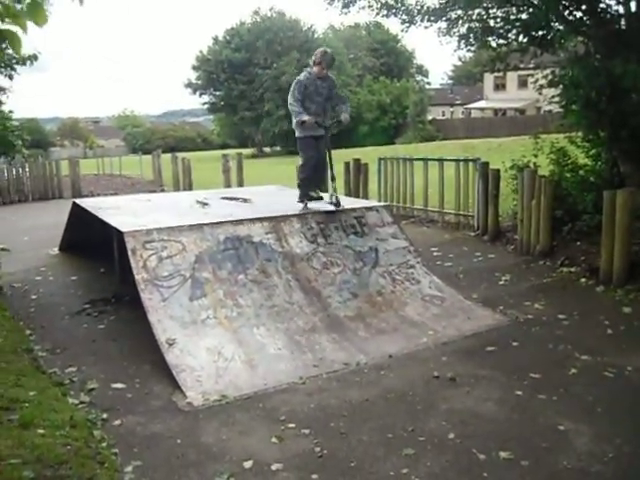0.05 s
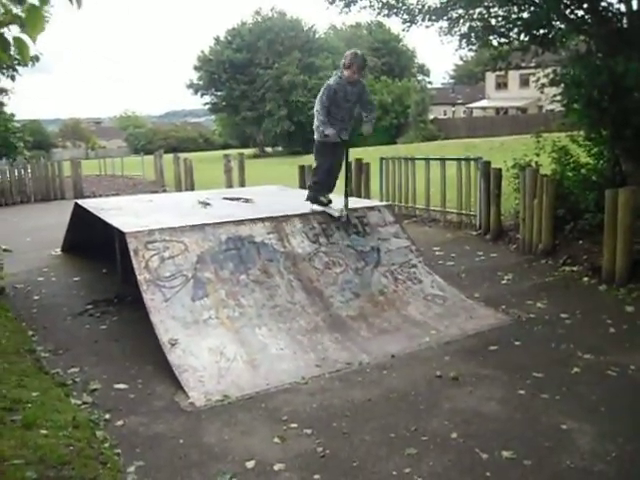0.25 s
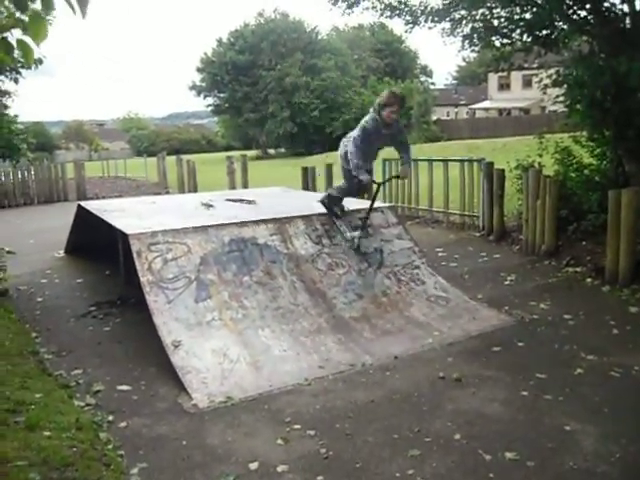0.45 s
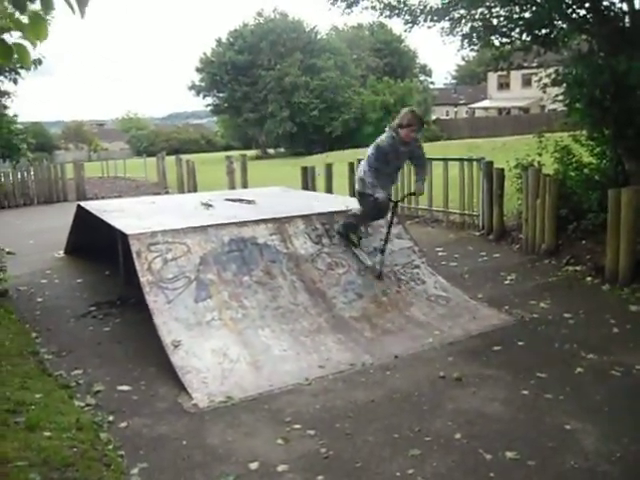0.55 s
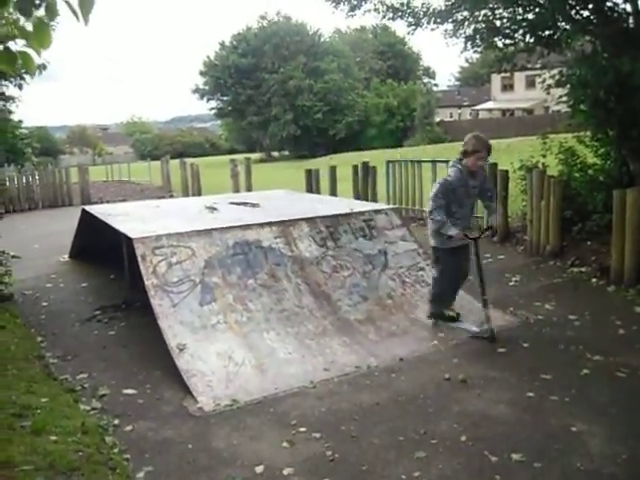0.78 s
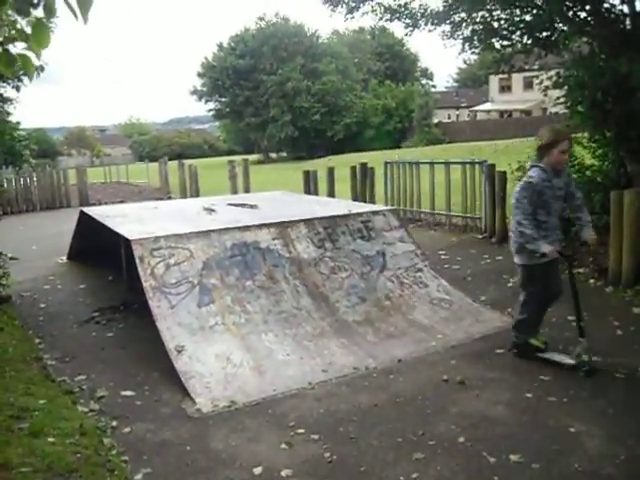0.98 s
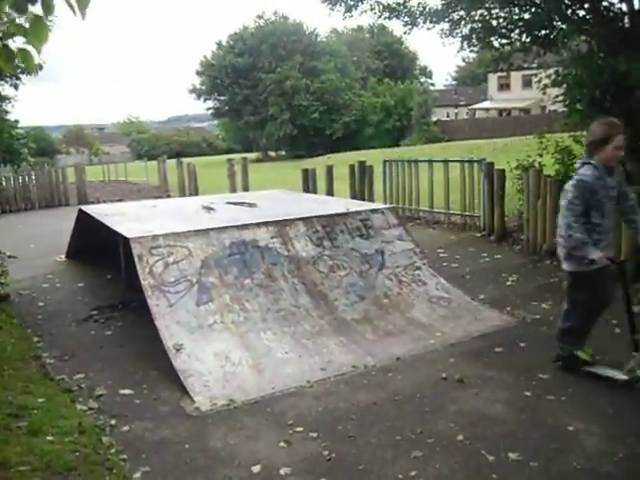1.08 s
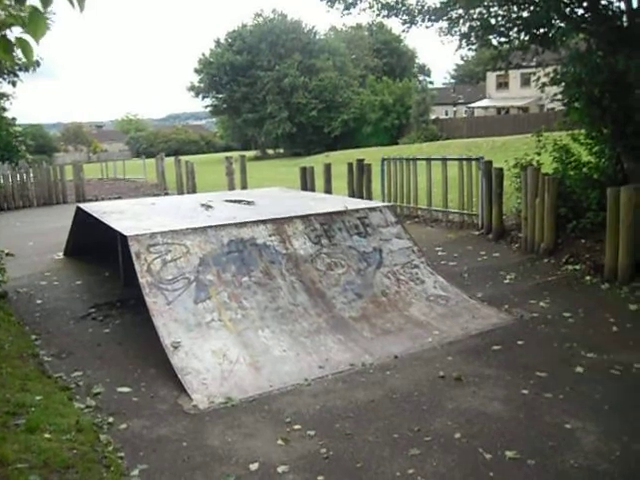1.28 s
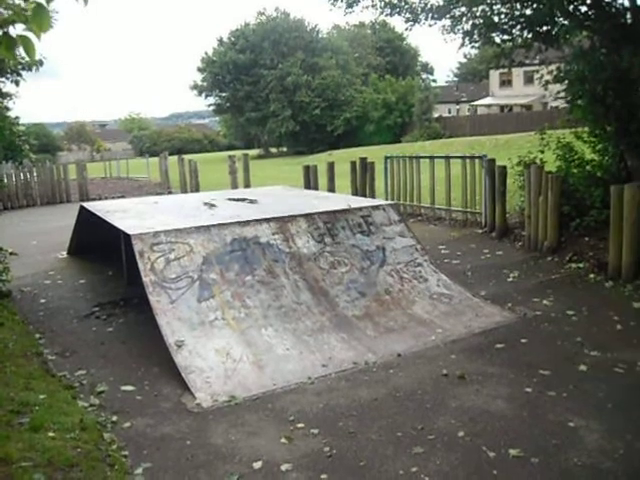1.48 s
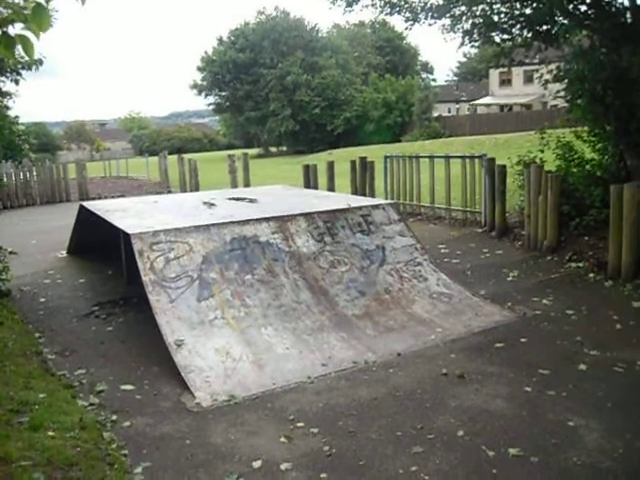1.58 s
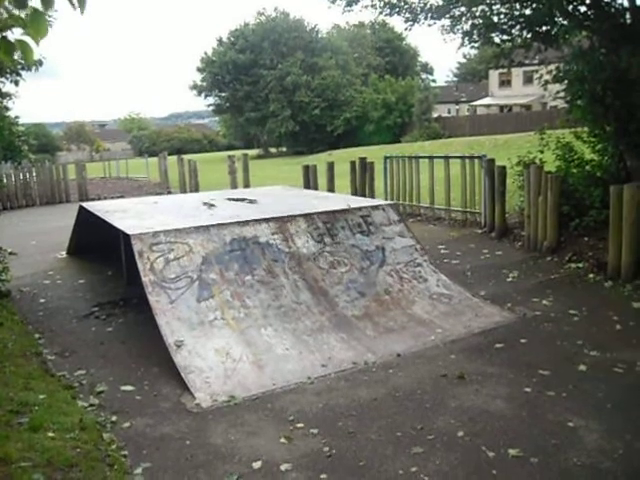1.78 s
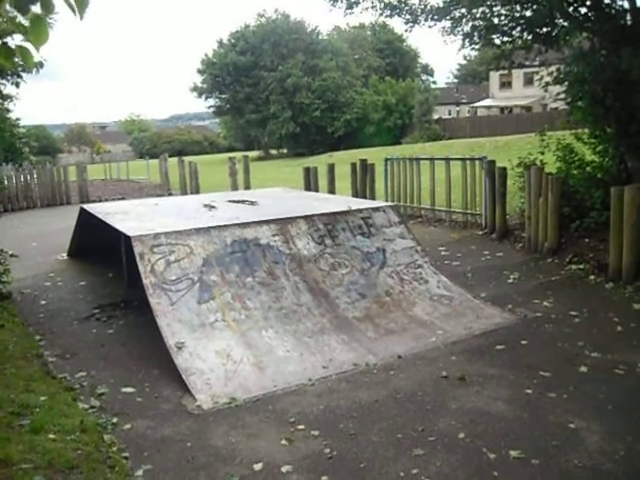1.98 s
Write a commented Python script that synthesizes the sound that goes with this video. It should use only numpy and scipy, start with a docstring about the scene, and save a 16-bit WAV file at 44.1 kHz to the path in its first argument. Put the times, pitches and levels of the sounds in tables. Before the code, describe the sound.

Kick scooter dropping down a booming ramp with metal clacks, then rolling off on gritty asphalt.

```python
"""Faint open air, then three hard clacks as a kick scooter drops into a sheet-covered skate ramp.
Its metal clangs against the edge, and its weight makes the hollow ramp boom.
The wheels rumble down the slope and roll off over rough asphalt, where loose parts rattle
at every bump and grit crackles, hisses and sets the wheels singing."""
import sys
import numpy as np
from scipy import signal
from scipy.fft import rfft, irfft
from scipy.io import wavfile

SR = 44100
rng = np.random.default_rng(int(sys.argv[2]) if len(sys.argv) > 2 else 0)


def master(y):
    """Save y as 16-bit WAV."""
    cut = np.clip(np.atleast_2d(y).T, -1, 1)
    pcm = np.round(cut * 32767)  # scale
    wavfile.write(sys.argv[1], SR, pcm.astype(np.int16))


N = 90404
TIME = np.arange(N) / SR


# the air's colour, meaning how strong it is from low to high: (frequency [Hz], level [dB per Hz])
AIR_COLOUR = [(28, -2), (55, -10), (100, -14), (280, -27.5), (600, -32.5), (6000, -38.5), (8500, -41)]

def open_air():
    """A faint, steady, deep rush of noise."""
    return from_db(-52.5) * coloured(rng.standard_normal(N), AIR_COLOUR)


# hits and bounces at the ramp's edge and foot: (time [s], level [dB], treble [dB], contact length [s],
# boosted frequency [Hz], clang pitch [ratio], ring level [dB], ring fade time [s])
HITS = [(0.2065, -18, 1, 0.004, 4180, 0.97, -25.5, 0.24),
        (0.246, -37.5, -0.5, 0.0062, 2860, 1.02, -38, 0.29),
        (0.3774, -25, 2.5, 0.004, 1400, 1.1, -36, 0.22),
        (0.4778, -17, 0.5, 0.0021, 3030, 1.11, -31.5, 0.22),
        (0.4809, -19, -1.5, 0.0038, 1100, 1.12, -29, 0.21), (0.756, -38, -8, 0.0064, 1060, 1.1, -47, 0.083),
        (0.916, -24.5, -8.5, 0.0022, 2080, 1.27, -44, 0.2)]
# colours of the crack and of the ringing after it: (frequency [Hz], level [dB per Hz])
CRACK_COLOUR = [(350, -6), (600, -1), (850, 1), (1100, 5.5), (1600, 3), (2050, 3), (3200, 3.5),
                (4200, -3.5), (5500, 5.5), (7000, -4.5), (8500, -28)]
AFTER_RING_COLOUR = [(350, -13), (700, -5.5), (1300, -3), (2000, 5), (2900, 1.5), (4200, 4.5), (5600, -5.5),
                     (7000, -1), (8500, -35)]
# notes of the metal touching the edge, and of the deck and bar: (frequency [Hz], level [dB])
CLANG_NOTES = [(860, -10), (1320, -13.5), (2000, -9.5), (2830, -8.5), (3380, -11.5), (3950, -9.5),
               (4300, -11), (6850, -22.5)]
FRAME_NOTES = [(1780, -6), (2130, -4.5), (2470, -3), (2762, 3), (2830, 1.5), (2948, -1.5), (3747, -8.5),
               (4011, -6), (4320, -4)]
CRACK_DB, FRAME_DB, FRAME_FADE_S = -1.5, -9, 0.21

def clacks():
    """Metal hits the edge: a crack and a short clang, then the scooter rings on."""
    out, kicks = np.zeros(N), np.zeros(N)
    for s, db, treble_db, length_s, boost_hz, pitch, ring_db, fade_s in HITS:
        touch = contact(length_s)
        clang = sum(from_db(note_db) * treble(hz, treble_db) * tone(touch, hz * pitch)
                    for hz, note_db in CLANG_NOTES)
        crack = from_db(CRACK_DB) * burst(touch, CRACK_COLOUR, treble_db)
        add(out, s, from_db(db) * boosted(crack + clang, boost_hz, sharpness=5.2, db=7))
        add(out, s, from_db(ring_db) * burst(dying(fade_s, samples=20000), AFTER_RING_COLOUR, treble_db))
        add(kicks, s, from_db([ring_db + FRAME_DB]))
    return out + ring(kicks, [(hz, db, FRAME_FADE_S) for hz, db in FRAME_NOTES])


# weight landing on the ramp: (time [s], push [dB], push length [s], boom [dB], bass [dB], pitch [ratio])
LANDINGS = [(0.205, -22.5, 0.01, -33.5, -6, 0.92), (0.374, -14, 0.015, -20.5, -11.5, 0.97),
            (0.475, -17, 0.0098, -26.5, -9, 1.01), (0.505, -22, 0.01, -46.5, 13.5, 1),
            (0.542, -38, 0.0065, -30.5, 0.5, 1), (0.758, -25.5, 0.0016, -33, -31, 1.05)]
# the hollow ramp's main notes: (frequency [Hz], level [dB], fade time [s])
RAMP_NOTES = [(39.1, 6, 0.91), (69.04, 7, 0.58), (137.4, -5, 0.34), (201.5, -2, 0.42), (240, 0, 0.77),
              (267.3, 0, 0.24), (315.7, -4, 0.49), (510, -20.5, 1.1), (581, -16, 0.47)]
# the sheet's many other notes, blurred together: (frequency [Hz], level [dB per Hz])
SHEET_COLOUR = [(30, -18.5), (70, -9.5), (130, 7), (240, 3.5), (320, -3), (420, -13), (700, -11),
                (1100, -20.5), (2000, -34.5)]
RAMP_RING_DB, SHEET_DB, SHEET_FADE_S = -4.5, -4.5, 0.53
BASS_FULL_HZ, BASS_UNTIL_HZ = 110, 189

def ramp_booms():
    """Each landing bends the sheet out and back; the ramp booms, deeper at some spots than others."""
    out = np.zeros(N)
    for s, push_db, length_s, boom_db, bass_db, pitch in LANDINGS:
        progress = np.minimum(TIME[:SR // 16] / length_s, 1)
        bend = np.sin(3 * np.pi * progress) * np.sin(np.pi * progress)
        bass = [(BASS_FULL_HZ, bass_db), (BASS_UNTIL_HZ, 0)]
        notes = [(hz * pitch, db + at_hz(bass, hz), fade_s) for hz, db, fade_s in RAMP_NOTES]
        sheet = [(hz, db + at_hz(bass, hz)) for hz, db in SHEET_COLOUR]
        add(out, s, from_db(push_db) * bend)
        add(out, s, from_db(boom_db + SHEET_DB) * burst(dying(SHEET_FADE_S, samples=30000), sheet))
        add(out, s, from_db(boom_db + RAMP_RING_DB) * ring(signal.unit_impulse(SR), notes))
    return out


# how loud the rolling is: (time [s], level [dB])
ROLL_LEVELS = [(0, -66), (.2, -64.5), (.36, -48.5), (.8, -42), (1.05, -50), (1.3, -47), (1.45, -51),
               (1.75, -50), (2.05, -49)]
# its colour: (frequency [Hz], level [dB per Hz])
ROLL_COLOUR = [(30, -2), (65, 0.5), (110, 1), (180, 2), (250, 6), (345, 1), (450, -6), (650, -10),
               (1000, -8.5), (2000, -30.5)]

def wheel_rumble():
    """Rolling wheels make a low noise that swells down the slope."""
    return level(ROLL_LEVELS) * coloured(rng.standard_normal(N), ROLL_COLOUR)


# knocks at the bumps: (time [s], relative level [dB], treble [dB], pitch [Hz])
KNOCKS = [(0.55, -20, -2.5, 1703), (0.7743, -16, -17, 1284), (0.868, -20.5, -14, 1830),
          (0.885, -21, -15.5, 980), (0.9154, -15.5, -25, 2090), (0.951, -17.5, -2.5, 4020),
          (0.9704, -16, -10, 2100), (0.992, -23.5, -5.5, 1720), (1.208, -22, -11.5, 4270),
          (1.279, -24.5, -7.5, 1070), (1.325, -20.5, -9, 286), (1.332, -27.5, 1.5, 1240),
          (1.461, -21, -10.5, 2220), (1.497, -26, -14, 2200), (1.525, -24, -14.5, 2220),
          (1.594, -26, -12, 1800), (1.67, -23, -10, 2340), (1.729, -22, -8.5, 1740),
          (1.761, -26.5, -4, 295), (1.803, -26, -11.5, 1110), (1.869, -24, -8, 1720),
          (1.951, -16.5, -7, 1860)]
# their colour: (frequency [Hz], level [dB per Hz])
KNOCK_COLOUR = [(150, 1.5), (300, 4.5), (550, -4), (1100, 1), (1500, 0.5), (2100, 5.5), (3100, 1.5),
                (4500, 3), (6500, -6), (8500, -8.5)]
RATTLE_DB, RATTLE_RING_DB, KNOCK_TONE_DB = -7.5, -10.5, -6
BOUNCE_S, BOUNCE_DB = 0.012, -10.5

def rattles():
    """A loose part knocks, rings briefly at its own pitch and falls back once."""
    out = np.zeros(N)
    touch = contact(length_s=0.003)
    tail = dying(fade_s=0.14, samples=7000)
    for s, db, treble_db, hz in KNOCKS:
        gain = from_db(db + RATTLE_DB)
        add(out, s, gain * burst(touch, KNOCK_COLOUR, treble_db))
        add(out, s, gain * from_db(RATTLE_RING_DB) * burst(tail, KNOCK_COLOUR, treble_db))
        bounce_at = s + BOUNCE_S * (.5 + rng.random())
        add(out, bounce_at, gain * from_db(BOUNCE_DB) * burst(touch, KNOCK_COLOUR, treble_db))
        add(out, s, gain * from_db(KNOCK_TONE_DB) * tone(dying(fade_s=0.025, samples=4000), hz))
    return out


def grit_clicks(per_s=3500, spread_db=2, clump_db=3.5, clump_s=1 / 60):
    """Grit crushed under the wheels: random clicks that come in clumps."""
    clump_times = np.arange(0, TIME[-1] + 1, clump_s)
    sizes = from_db(spread_db * np.minimum(rng.exponential(1, N), 5))
    signs = rng.choice([-1, 1], N)
    flutter = np.interp(TIME, clump_times, rng.standard_normal(N)[:len(clump_times)])
    crushed = rng.random(N) < per_s / SR
    return sizes * signs * from_db(clump_db * flutter) * crushed


# how loud the grit is: (time [s], level [dB])
CRACKLE_LEVELS = [(0, -81), (.4, -77), (.6, -51), (.85, -54.5), (.97, -47.5), (1.05, -56), (1.11, -45.5),
                  (1.25, -58), (1.34, -47.5), (1.41, -56), (1.54, -51), (1.64, -61), (1.76, -54.5),
                  (2.05, -57)]
# its colour: (frequency [Hz], level [dB per Hz])
CRACKLE_COLOUR = [(350, -39), (600, 8), (1100, 1), (1700, 7.5), (2250, 6), (3000, 3), (4600, -2.5),
                  (6100, -19), (8500, -14)]

def grit_crackle(clicks):
    """The clicks under the wheels blend into a rough crackle."""
    return level(CRACKLE_LEVELS) * coloured(clicks, CRACKLE_COLOUR)


# notes of the wheels and bearings: (frequency [Hz], level [dB], fade time [s], loudest at [s])
WHEEL_NOTES = [(4600, 1, 0.073, 1.3), (5725, 1, 0.08, 1.6), (6650, 10, 0.022, 1.52), (7490, 5, 0.022, 1.27),
               (8265, 3.5, 0.033, 1.38)]
# how loudly they sing: (time [s], level [dB])
SINGING_LEVELS = [(0, -76), (.7, -68), (.77, -47.5), (.84, -54.5), (.96, -50), (1.5, -55), (1.65, -58),
                  (2.05, -51)]

def wheel_singing(clicks, swell_s=0.46):
    """Grit sets the wheels ringing; each note swells and fades in its own time."""
    notes = 0
    for hz, db, fade_s, loudest_s in WHEEL_NOTES:
        swell = 1 / np.hypot(1, ((TIME - loudest_s) / swell_s) ** 2)
        notes = notes + swell * ring(clicks, [(hz, db, fade_s)])
    return level(SINGING_LEVELS) * unit_level(notes)


# the wheels scuff sideways: (time [s], level [dB], length [s])
SIDE_SCUFFS = [(1.082, -37.5, 0.04), (1.185, -39.5, 0.027), (1.742, -47, 0.036)]
# colour of the hiss: (frequency [Hz], level [dB per Hz])
HISS_COLOUR = [(2500, -21), (3800, -7), (5000, 3), (6100, -6.5), (7400, -1.5), (8500, -5)]
HISS_DB = -1.5

def grit_hiss():
    """Fine grit hisses along with the singing wheels and flares at each scuff."""
    loudness = from_db(HISS_DB) * level(SINGING_LEVELS)
    for s, db, length_s in SIDE_SCUFFS:
        add(loudness, s, from_db(db) * contact(length_s))
    return loudness * coloured(grit_clicks(), HISS_COLOUR)


def from_db(db):
    """Turn decibels into a gain, a number to multiply by."""
    return 10 ** (np.asarray(db) / 20)


def unit_level(x):
    """Scale to an average (rms) level of 1."""
    return x / np.sqrt(np.mean(x ** 2) + 1e-20)


def level(curve):
    """Gain over time from (time [s], level [dB]) rows."""
    return from_db(np.interp(TIME, *np.transpose(curve)))


def at_hz(points, hz):
    """Read between (frequency [Hz], level [dB]) rows."""
    frequencies, db = np.transpose(points)
    return np.interp(np.log(hz + 1e-9), np.log(frequencies), db)


def coloured(x, colour):
    """Give a steady sound a colour, at an average level of 1."""
    hz = np.arange(N // 2 + 1) * SR / N
    low_cut = np.minimum(hz / colour[0][0], 1) ** 2
    return unit_level(irfft(rfft(x) * from_db(at_hz(colour, hz)) * low_cut, N))


def add(out, s, x):
    """Mix x in from time s."""
    start = int(s * SR)
    out[start:start + len(x)] += x[:N - start]


def contact(length_s):
    """Loudness shape of a touch: a quick rise and fall."""
    t = TIME[:SR // 8] / length_s * np.e
    return t * np.exp(1 - t)


def dying(fade_s, samples, rise_s=0.0012):
    """Loudness shape of a ring: it drops 60 dB in the fade time."""
    t = TIME[:samples]
    return (1 - np.exp(-t / rise_s)) * np.exp(-np.log(1000) * t / fade_s)


def tone(shape, hz):
    """One pure note that follows a loudness shape."""
    return np.sqrt(2) * shape * np.sin(2 * np.pi * (hz * TIME[:len(shape)] + rng.random()))


def treble(hz, db, from_hz=1050, full_hz=4440):
    """Gain that makes a hit brighter or duller."""
    return from_db(at_hz([(from_hz, 0), (full_hz, db)], hz))


def boosted(x, hz, sharpness, db):
    """Lift the sound around one frequency."""
    return x + (from_db(db) - 1) * signal.lfilter(*signal.iirpeak(hz, sharpness, fs=SR), x)


def ring(clicks, notes):
    """Each click sets every note ringing; every second note is flipped in sign."""
    out = 0
    for k, (hz, db, fade_s) in enumerate(notes):
        decay, step = from_db(-60 / (fade_s * SR)), 2 * np.pi * hz / SR
        feedback = [1, -2 * decay * np.cos(step), decay * decay]
        out = out + (-1) ** k * from_db(db) * signal.lfilter([0, np.sin(step)], feedback, clicks + 1e-18)
    return out


EDGES_HZ = np.concatenate([np.geomspace(25, 700, 11)[:-1], np.geomspace(700, 9800, 14)])
# slices of the range from low to high: (centre [Hz], width [Hz], filter)
BANDS = [(np.sqrt(lo * hi), hi - lo, signal.butter(2, [lo, hi], "band", fs=SR, output="sos"))
         for lo, hi in zip(EDGES_HZ, EDGES_HZ[1:])]

def burst(shape, colour, treble_db=0):
    """Notes too crowded to tell apart: coloured noise that follows a loudness shape."""
    out, energy = 0, 0
    noise = rng.standard_normal((2, len(shape))) * shape
    for k, (hz, width, band_filter) in enumerate(BANDS):
        if hz > colour[0][0] * np.sqrt(.5):
            gain = from_db(at_hz(colour, hz)) * np.sqrt(width)
            band = unit_level(signal.sosfilt(band_filter, noise[k % 2] + 1e-18))
            out = out + gain * treble(hz, treble_db) * band
            energy += gain ** 2
    return out * np.sqrt(np.mean(shape ** 2) / energy)


def scene():
    """Scooter and ramp over faint open air, in one channel."""
    air = open_air()
    clicks = grit_clicks()
    wheels = wheel_rumble() + grit_crackle(clicks) + wheel_singing(clicks) + grit_hiss()
    return (air + wheels + clacks() + ramp_booms() + rattles())[None]


# how the highest treble is turned down: (frequency [Hz], level [dB])
TREBLE_FADE = [(7700, -0.5), (7950, -25), (8350, -9.5), (9000, -27.5)]
CUTOFF_HZ = 8850

def record(dry):
    """The highest treble fades unevenly, then is cut off steeply."""
    hz = np.arange(N + 1) * SR / (2 * N)
    softened = irfft(rfft(dry, 2 * N) * from_db(at_hz(TREBLE_FADE, hz)))[:, :N]
    return signal.sosfilt(signal.cheby1(12, .3, CUTOFF_HZ, fs=SR, output="sos"), softened)


dry = scene()
out = record(dry)
master(out)
```